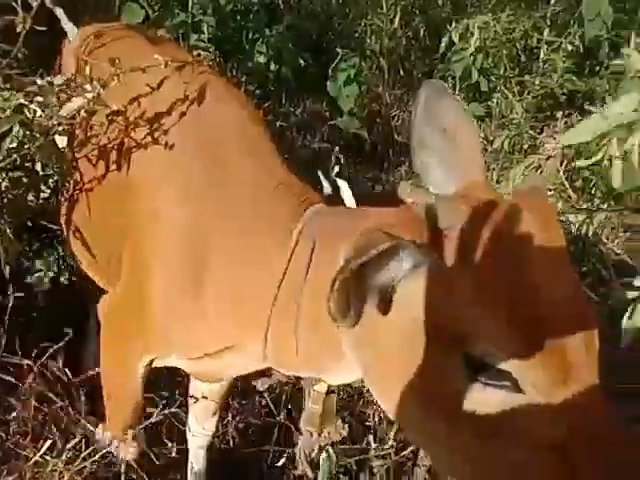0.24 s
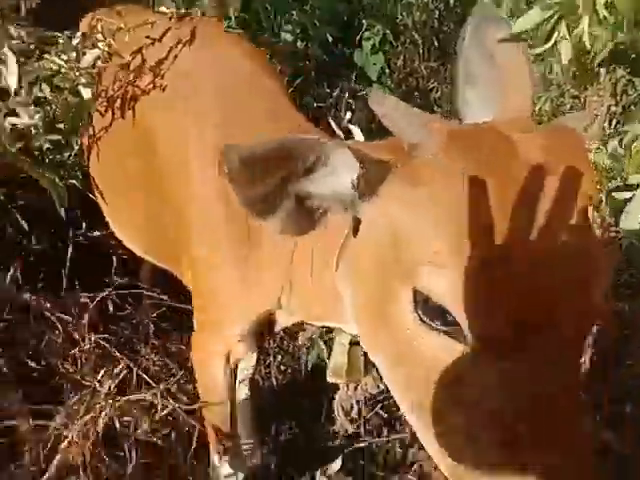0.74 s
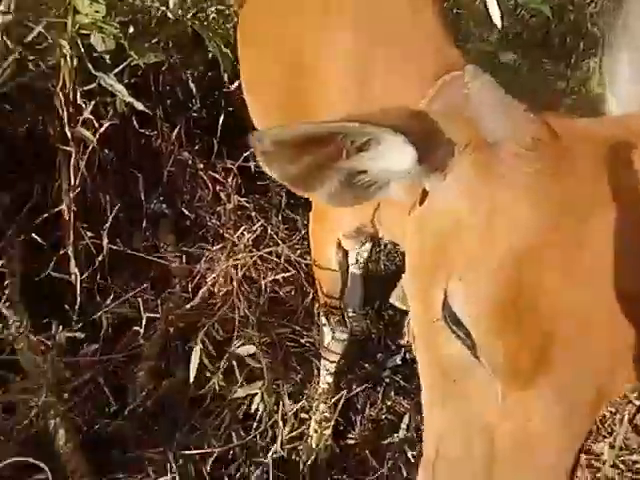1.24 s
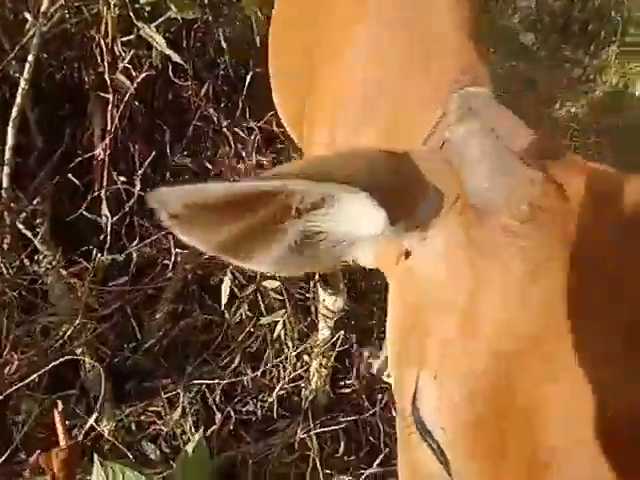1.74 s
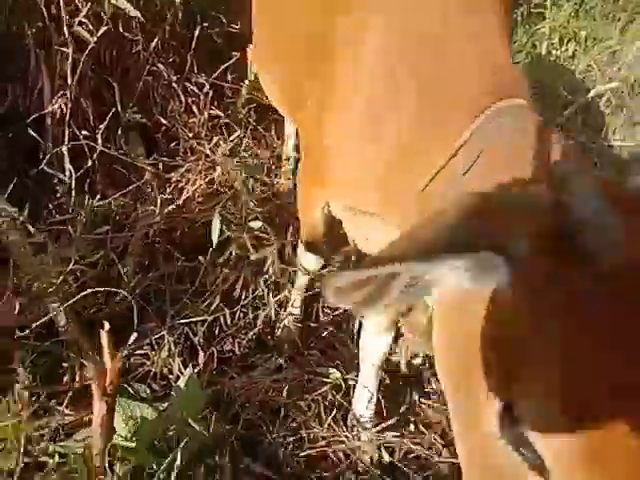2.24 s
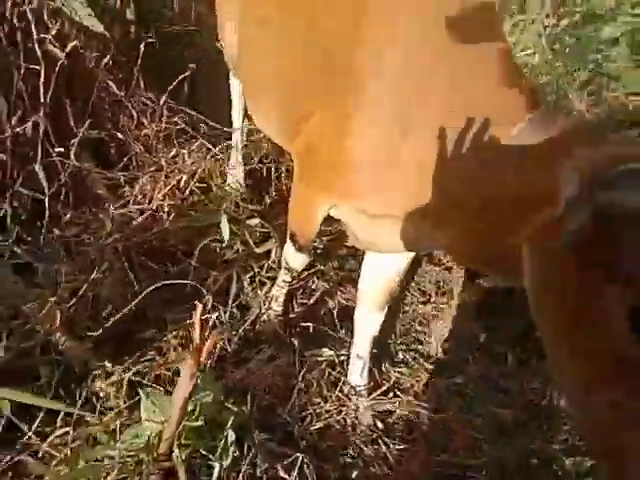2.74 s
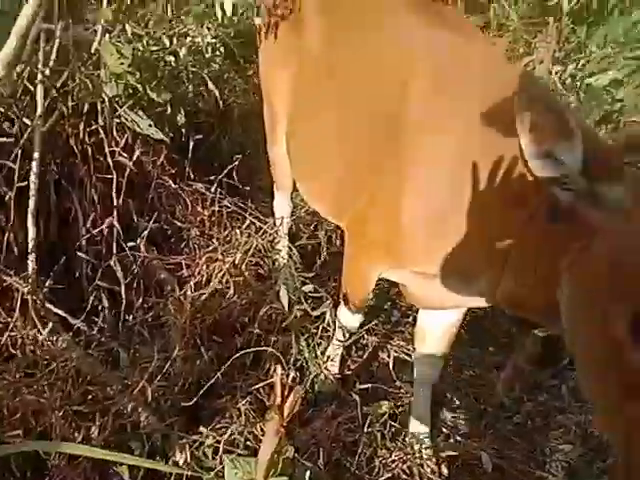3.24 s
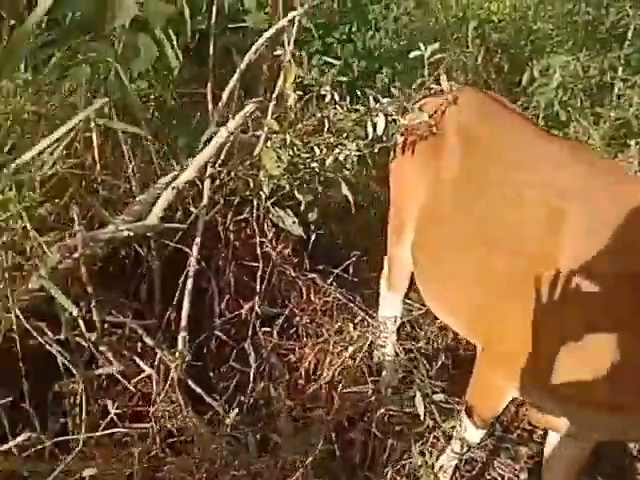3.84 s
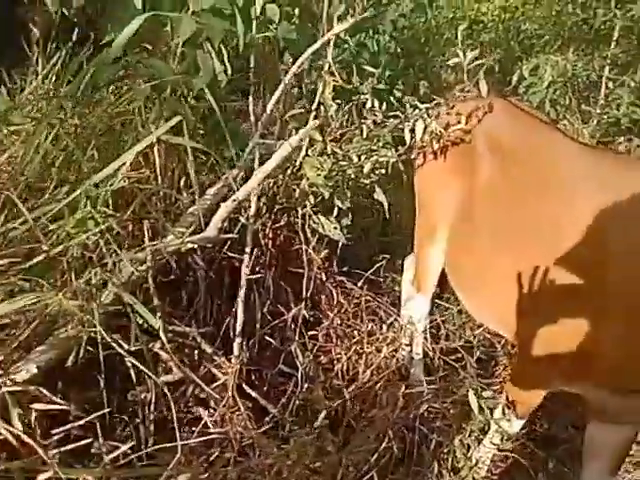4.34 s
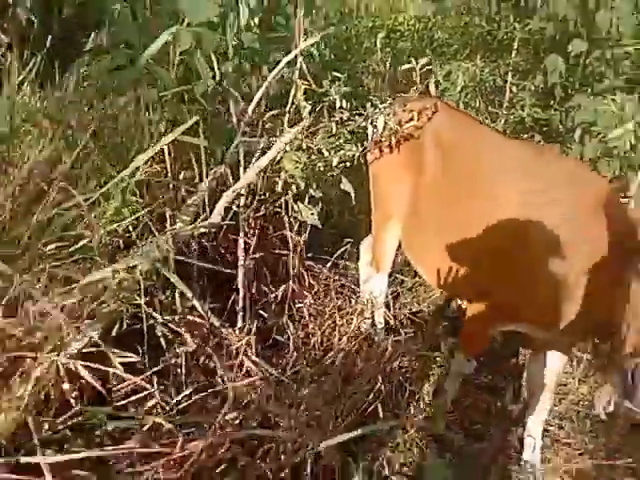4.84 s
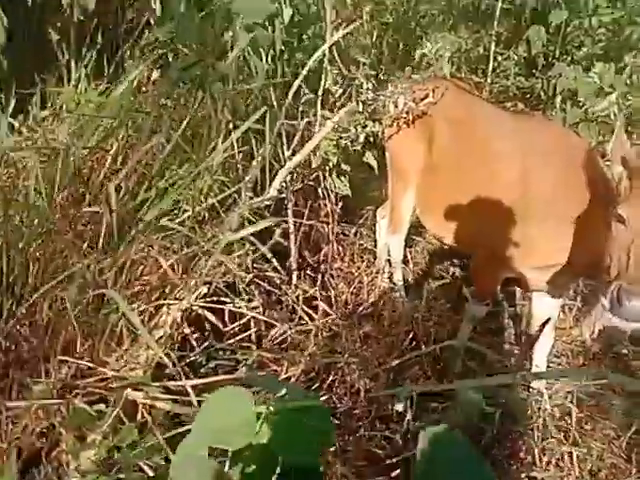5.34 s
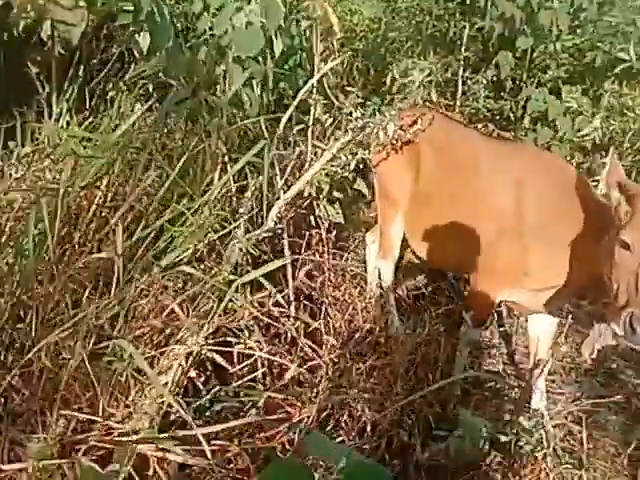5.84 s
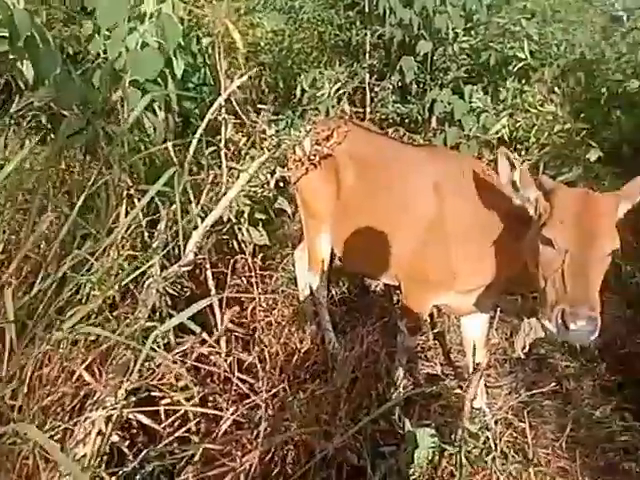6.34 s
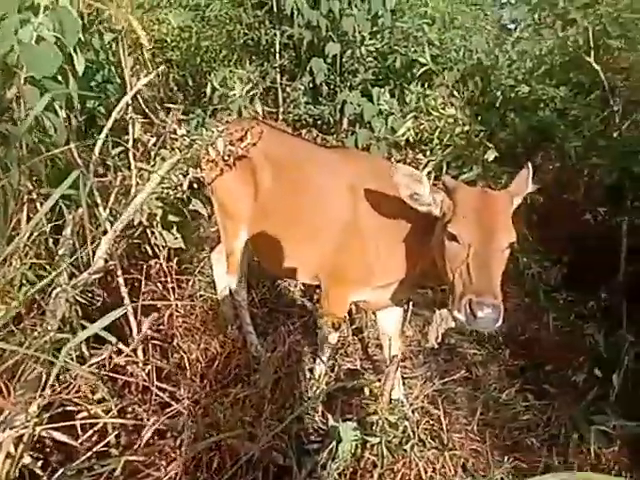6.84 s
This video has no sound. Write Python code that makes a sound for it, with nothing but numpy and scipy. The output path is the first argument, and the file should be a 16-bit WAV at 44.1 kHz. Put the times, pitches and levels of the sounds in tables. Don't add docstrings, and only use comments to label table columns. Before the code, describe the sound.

Crisp twig snaps, scraping stems and swishing leaves as a cow feeds, with one soft snort, against a steady high insect buzz and low engine hum.

```python
import sys
import numpy as np
from scipy import signal
from scipy.fft import rfft, irfft
from scipy.io import wavfile
from scipy.ndimage import uniform_filter1d

SR = 44100
rng = np.random.default_rng(int(sys.argv[2]) if len(sys.argv) > 2 else 0)


def put_to_file(sound):
    columns = np.atleast_2d(sound).T
    safe = np.clip(columns, -1, 1)
    whole_steps = np.round(safe * 32767)
    wavfile.write(sys.argv[1], SR, whole_steps.astype(np.int16))


N = 313242
T = np.arange(N) / SR

# peak in seconds, span in seconds, stems in dB, leaves in dB.
PULLS = [(0.1, 0.04, -54.5, -72), (0.2, 0.095, -53, -61.5), (0.39, 0.077, -60, -61.5),
         (0.56, 0.11, -48, -56.5), (0.62, 0.05, -47.5, -55), (0.765, 0.035, -44, -58.5),
         (1.22, 0.1, -60, -81), (1.46, 0.14, -58.5, -65), (1.68, 0.11, -46, -58.5),
         (1.775, 0.045, -44, -57), (1.91, 0.052, -52, -64), (1.95, 0.13, -49.5, -58.5),
         (2.38, 0.38, -57, -63.5), (2.82, 0.15, -58, -63), (2.925, 0.0061, -53, -55),
         (3.18, 0.11, -58, -62.5), (3.62, 0.1, -51.5, -59), (3.73, 0.085, -50.5, -60),
         (3.935, 0.016, -51, -64), (4.03, 0.086, -55, -64), (4.11, 0.037, -55, -63),
         (4.17, 0.084, -67, -67.5), (4.83, 0.13, -55.5, -66.5), (5.05, 0.085, -52.5, -60),
         (5.155, 0.089, -45, -62.5), (5.29, 0.24, -58, -66), (5.645, 0.074, -49, -59),
         (5.93, 0.078, -61.5, -70), (6.49, 0.045, -71, -69), (6.59, 0.082, -62.5, -77)]
STEMS_REST_DB, LEAVES_REST_DB, LEAVES_RECEDE_DB_PER_S = -66.5, -70.5, 4
# start in seconds, time to fall 60 dB in seconds, stems in dB, leaves in dB.
WHIPS = [(0.086, 0.23, -46.5, -63), (0.128, .3, -56, -68), (0.345, .3, -57, -63), (0.708, 0.29, -43, -52),
         (1.424, .2, -58, -64), (1.876, .2, -53, -67), (2.082, 0.31, -60, -57), (2.18, .2, -66, -58),
         (2.921, 0.092, -60, -54), (3.088, 0.25, -62, -71), (3.481, 0.23, -72, -72), (5.003, .2, -59, -63),
         (5.262, 0.13, -53, -59), (5.429, .2, -67, -68), (5.565, .3, -57, -68)]
# peak in seconds, span in seconds, brushing in dB, bell in dB.
MOVES = [(0.36, 0.55, -60.5, -57.5), (0.57, 0.17, -59, -54.5), (0.76, 0.056, -57, -49),
         (0.95, 0.11, -63, -65), (1.235, 0.039, -56, -46), (1.43, 0.35, -59, -56), (1.68, 0.081, -56, -53),
         (1.77, 0.06, -47, -51), (1.95, 0.21, -60, -54.5), (2.41, 0.3, -65, -62), (2.65, 0.33, -65, -56.5),
         (3.16, 0.3, -67, -65), (3.6, 0.13, -48.5, -51.5), (3.74, .07, -61, -49), (4.03, 0.25, -58, -60.5),
         (4.4, 0.68, -75, -75.5), (4.83, 0.25, -58.5, -61), (5.02, 0.047, -57, -54),
         (5.15, 0.033, -55, -50), (5.28, 0.12, -61, -62), (5.63, 0.11, -57, -51.5),
         (5.93, 0.11, -64, -58.5), (6.05, 0.37, -83, -68), (6.75, 0.027, -65, -65), (7.09, 0.04, -60, -60)]
BRUSH_REST_DB, BELL_REST_DB = -63, -69
# frequency in Hz, level in dB per Hz.
STEM_COLOUR = [(800, -22), (1500, -3.5), (2900, 0), (4500, -8.5), (5600, 1.5), (7000, -3.5), (9000, -55)]
LEAF_COLOUR = [(3000, -10.5), (5000, -0.5), (8300, -9), (10000, -3), (12000, -7.5), (13800, -12.5),
               (14500, -3.5), (16000, 3)]
BRUSH_COLOUR = [(300, -21), (480, -1), (800, 0), (1300, -3), (2200, -27)]
# start in seconds, level in dB, pitch in Hz, width in Hz, length in seconds.
SCRAPES = [(0.537, -49, 3340, 1780, .025), (0.584, -51, 2730, 1500, 0.04), (0.706, -49, 2320, 3000, .075),
           (0.758, -41.5, 3120, 1600, 0.028), (1.188, -51, 1900, 910, 0.0087),
           (1.2, -53.5, 1970, 1300, 0.051), (1.271, -59, 1460, 120, 0.049), (1.521, -60, 790, 143, 0.16),
           (1.591, -71, 2700, 300, 0.074), (1.61, -55, 3530, 300, 0.059), (1.647, -51, 2020, 900, 0.032),
           (1.777, -39.5, 3080, 1400, 0.017), (1.881, -46, 3880, 1800, 0.02), (1.933, -57, 855, 200, 0.044),
           (2.213, -67, 805, 150, 0.13), (3.7, -52.5, 910, 400, 0.042), (4.007, -52, 3340, 1200, 0.053),
           (5.145, -55, 2300, 1810, 0.045), (5.154, -43, 3000, 2500, 0.0053),
           (3.924, -49, 3000, 4000, .012), (5.292, -57, 1200, 506, 0.024), (5.636, -49, 1890, 2500, 0.038),
           (5.645, -41, 1500, 2200, .008), (1.187, -54, 2600, 2000, .006), (1.208, -59, 2500, 1400, .035)]
# start in seconds, peak in dB, pitch in Hz, time for the ring to fall 60 dB in seconds,
# bright crack in dB relative to the peak.
TWIGS = [(0.0596, -31, 4000, 0.006, -11), (0.54, -29.5, 3850, 0.012, -15), (0.5536, -28, 3630, 0.01, -15),
         (0.7113, -37, 3700, 0.0098, -14), (0.761, -26.5, 2950, 0.013, -19),
         (0.7782, -24, 2800, 0.0063, -17), (0.9632, -35, 3270, 0.0036, -12), (2.033, -46, 4000, 0.004, -4),
         (1.6268, -35, 2760, 0.013, -14), (1.6742, -33.5, 3240, 0.028, -11),
         (1.7752, -32, 3050, 0.012, -22), (1.8781, -36, 4860, 0.014, -10), (1.914, -37, 1760, 0.033, -14),
         (2.0947, -32, 2960, 0.0072, -12), (4.0284, -42, 2870, 0.011, -9), (4.1016, -34.5, 4940, 0.024, -4),
         (5.155, -24.5, 1970, 0.0053, -21), (5.6506, -26, 2150, 0.012, -19), (6.582, -37, 2650, 0.012, -27),
         (6.6084, -44, 2980, 0.015, -14), (7.0235, -44, 2800, 0.014, -2)]
KNOCKS = [
    (0.587, -36.5, 1260, 0.026, -20),
    (0.819, -40, 440, 0.04, -20),
    (1.189, -35, 1300, 0.02, -14),
    (1.214, -36, 1300, 0.028, -23),
    (1.254, -34.5, 1300, 0.025, -22),
    (1.418, -58, 1280, 0.018, -20),
    (1.738, -35, 1250, 0.016, -20),
    (1.777, -23.5, 1210, 0.045, -28),
    (1.784, -37, 1220, 0.016, -15),
    (3.924, -20.5, 754, 0.013, -8.5),
]
POPS = [
    (2.421, -41.5, 860, 0.042, -30),
    (5.65, -40.5, 830, 0.047, -26),
]
# start in seconds, peak in dB, pitch in Hz.
SPLINTERS = [(0.0862, -37, 3530), (0.3441, -45, 2010), (0.585, -34, 2970), (0.6898, -40, 3700),
             (0.7274, -36, 2900), (0.8114, -43, 2980), (0.863, -37, 2540), (0.8909, -33, 4710),
             (1.0321, -47, 4780), (1.4182, -43, 2110), (1.6437, -37, 2120), (1.8864, -35, 3930),
             (2.1221, -31, 2790), (2.7287, -48, 2590), (2.8733, -35, 4160), (2.9307, -41, 4770),
             (3.1657, -44, 1520), (3.631, -39, 3200), (3.922, -45, 2640), (4.083, -38, 2380),
             (4.8082, -38, 4800), (4.983, -41, 2590), (5.1238, -38, 1990), (5.2624, -37, 3900),
             (5.2894, -47, 3560), (5.427, -48, 3230), (5.5643, -47, 1700), (5.8915, -49, 2100),
             (7.068, -42, 1640)]
# start in seconds, peak in dB, pitch in Hz.
TICKS = [(0.091, -34, 10300), (0.1286, -56, 9510), (0.5033, -43, 11300), (0.5392, -41, 11300),
         (0.5831, -38, 11800), (0.62, -35, 9910), (0.7108, -41, 10500), (0.8624, -40, 10600),
         (0.891, -32.5, 11200), (1.7759, -52, 8880), (2.923, -33, 9900), (3.1847, -33, 9830),
         (3.482, -39, 10450), (3.6262, -45, 10500), (3.924, -44, 10700), (4.103, -30, 9570),
         (5.0045, -49, 9080), (5.0564, -36, 9710), (5.3398, -39, 10030), (5.4321, -47, 11790),
         (5.513, -38, 11300), (5.9174, -36, 11500), (6.325, -45, 10500), (6.6665, -59, 8590),
         (6.771, -47, 9210), (6.8109, -51, 10900), (7.023, -31, 10300)]
# start in seconds, peak in dB.
FLECKS = [(0.3461, -39), (0.9607, -60), (1.0326, -58), (1.3259, -53), (1.4242, -47), (1.5514, -49),
          (1.8756, -45), (1.9604, -37), (2.0812, -47), (2.2244, -43), (2.3072, -51), (2.5222, -48),
          (3.0879, -53), (3.3233, -50), (4.0008, -51), (4.1889, -51), (4.2527, -52), (4.5555, -63),
          (4.6543, -56), (4.9746, -48), (5.224, -46), (5.2644, -46), (5.3946, -58), (5.8207, -52),
          (5.879, -56), (6.0611, -65), (6.4313, -56), (6.7516, -52), (6.9117, -56)]
# time in seconds, effort in dB.
SNORT = [
    (5.12, -64),
    (5.145, -43),
    (5.19, -41),
    (5.23, -46.5),
    (5.3, -61),
]
# frequency in Hz, width in Hz, level in dB.
NOSTRILS = [(282, 120, 20), (400, 66, -6), (227, 100, 10)]
BELL_HZ, BELL_WIDTH = 1263, 80
# start in seconds, length in seconds, level in dB, pitch in Hz.
RINGS_FIRST = [(0.887, 0.043, -59, 1260), (0.997, 0.036, -59, 1262)]
RINGS_EARLY = [(2.289, 0.038, -54, 1286), (2.369, 0.069, -54, 1244), (2.488, 0.033, -72, 1270),
               (2.573, 0.033, -54, 1255), (2.604, 0.061, -66, 1237), (2.669, 0.051, -55, 1263),
               (2.75, 0.057, -56, 1300), (2.861, 0.035, -52, 1246), (2.898, 0.039, -58, 1280),
               (3.154, 0.044, -53.5, 1237), (3.262, 0.043, -55, 1257)]
RINGS_MIDDLE = [(4.129, 0.096, -56, 1240), (4.226, 0.028, -61, 1252), (4.32, 0.081, -57, 1259),
                (4.452, 0.03, -55, 1276), (4.512, 0.029, -57, 1269), (4.556, 0.031, -59, 1249),
                (4.645, 0.042, -55, 1259), (4.773, 0.035, -57, 1254), (4.827, 0.046, -65, 1255),
                (4.871, 0.046, -65, 1254)]
RINGS_FIFTH = [(5.206, 0.083, -58, 1265), (5.291, 0.041, -58, 1283), (5.493, 0.045, -56, 1285),
               (5.564, 0.047, -57, 1279)]
RINGS_LATE = [(5.715, 0.025, -57, 1267), (5.753, 0.032, -65, 1247), (5.964, 0.08, -56.5, 1260),
              (6.085, 0.046, -60, 1271), (6.219, 0.029, -59, 1276), (6.653, 0.034, -60.5, 1235),
              (6.726, 0.05, -54, 1252), (7.062, 0.042, -65, 1236)]
RING_EDGE_S = 0.012
# frequency in Hz, level in dB per Hz.
CHORUS = [(4500, -42), (5250, -6), (5650, -5.5), (6200, -2), (6570, -3), (7200, 0), (7700, -9.5),
          (8300, -37)]
# time in seconds, pulses per second.
PULSES = [(0, 103), (1.25, 103), (1.35, 93.1), (7.1, 93.1)]
# frequency in Hz, width in Hz, level in dB.
SINGERS = [
    (5622, 154, -6),
    (5827, 220, -7.5),
    (6587, 210, 0.5),
    (7050, 460, -6),
    (7360, 160, -16),
]
# time in seconds, level in dB.
HUM = [(0.0, -36), (0.43, -33), (0.67, -36), (0.95, -33.5), (1.2, -34), (1.8, -33), (2.03, -35),
       (2.27, -31.5), (2.6, -35.5), (2.72, -32), (3.47, -34), (3.6, -31.5), (3.93, -33.5), (4.72, -32),
       (5.04, -34), (5.79, -31), (6.11, -33), (7.1, -32)]
HUM_HZ = 74.96
# multiple of a third of the hum's pitch, level in dB.
SHAFT = [(2, -71), (4, -72), (5, -62), (6, -62), (7, -71.5)]
# time in seconds, pitch in Hz, level in dB.
VEHICLE = [
    [(2.45, 176, -68), (2.7, 176, -62), (3.2, 176, -58.5), (3.8, 177, -64), (4.0, 170.3, -88),
     (4.2, 174.3, -55), (4.45, 174, -69)],
    [(4.45, 172, -84), (4.6, 175.2, -53.5), (5.0, 175, -58.5), (5.3, 164.5, -56.5), (5.5, 161.6, -46.5),
     (5.7, 158.6, -50), (5.85, 154, -72)],
    [(5.6, 146.2, -62), (5.8, 147, -50), (6.05, 134.6, -49), (6.25, 130, -73)],
    [(5.55, 125, -81), (5.75, 119.8, -43.5), (6.0, 111.3, -51), (6.2, 107, -62)],
    [(3.55, 219, -71), (3.9, 219, -66), (4.1, 218, -70)],
]
# peak in seconds, span in seconds, rumble in dB, murmur in dB.
SURGES = [
    (0.457, 0.072, -62, -56.5),
    (0.28, 0.076, -62, -59),
    (1.78, 0.071, -45, -64),
    (3.56, 0.076, -38, -49),
    (3.57, 2.4, -64, -64),
    (6.75, 0.18, -62, -67),
    (4.58, 1.4, -59.5, -62.5),
    (6.13, 0.98, -45.5, -81),
    (7.1, 0.065, -36.5, -72),
]
# frequency in Hz, level in dB per Hz.
RUMBLE_COLOUR = [(12, -6), (25, 3), (42, -24), (62, 8), (95, 10), (170, -2.5), (260, -16.5), (500, -48)]
MURMUR_COLOUR = [(190, 3), (250, 0.5), (330, 10.5), (420, 6.5), (560, -35)]
AIR_COLOUR = [(200, -10), (500, 5), (1000, -12), (4500, -10.5), (8300, -14.5), (13800, -21.5), (14500, -9),
              (16000, -13)]
# start in seconds, length in seconds, start in Hz, end in Hz, level in dB.
BIRD = [
    (5.777, 0.093, 3260, 3410, -69),
    (5.903, .04, 3480, 3670, -64),
    (6.185, 0.051, 3120, 3040, -64.5),
    (6.878, 0.14, 3400, 3260, -69),
]


def gain_of(db):
    return 10 ** (np.asarray(db) / 20)


def white():
    return rng.standard_normal(N)


def evened(x):
    return x / np.sqrt(np.mean(x ** 2) + 1e-20)


def curves(rows, t=T):
    s, *columns = np.transpose(rows)
    return [np.interp(t, s, column) for column in columns]


def colour(x, points):
    f, db = np.transpose(points)
    hz = np.fft.rfftfreq(len(x), 1 / SR)
    shape_db = np.interp(np.log(hz + 1), np.log(f), db, -120, -120)
    return evened(irfft(rfft(x) * gain_of(shape_db), len(x)))


def drift(hz):
    f = np.fft.rfftfreq(N, 1 / SR)
    return evened(irfft(rfft(white()) / (1 + (f / hz) ** 2), N))


def resonate(x, hz, width):
    r = np.exp(-np.pi * width / SR)
    return 2 * signal.lfilter([1 - r], [1, -r * np.exp(2j * np.pi * hz / SR)], x).real


def resonate_twice(x, hz, width, second_width):
    return resonate(resonate(x, hz, width), hz, second_width)


def add(mix, s, sound):
    part = mix[round(s * SR):][:len(sound)]
    part += sound[:len(part)]


def tone(hz):
    return np.sqrt(2) * np.sin(2 * np.pi * np.cumsum(hz) / SR)


def patchy(x, db, bins, frames):
    z = signal.stft(x, nperseg=512, noverlap=384)[2]
    field = uniform_filter1d(rng.standard_normal(z.shape), bins, 0)
    field = uniform_filter1d(field, frames, 1)
    return evened(signal.istft(z * gain_of(db * evened(field)), nperseg=512, noverlap=384)[1][:N])


def swells(rows, *rest_db):
    s, span, *peaks_db = np.transpose(rows)[:, :, None]
    t = T[::64]
    late = (t - s) / np.clip(span, 0.005, 9)
    late = np.where(late < 0, -late / 1.44, late)
    fall_db = 14 * late ** 1.69
    levels = []
    for db, rest in zip(peaks_db, rest_db):
        power = gain_of(2 * rest) + gain_of(2 * (db - fall_db)).sum(0)
        levels.append(np.interp(T, t, 10 * np.log10(power)))
    return levels


def whipped(db, column):
    power, t = np.zeros(N), np.arange(12000) / SR
    for row in WHIPS:
        add(power, row[0], gain_of(2 * (row[column] - 60 * t / np.clip(row[1], 0.03, 0.6))))
    return 10 * np.log10(gain_of(2 * db) + power)


def crackle(per_s, spread_db, hiss, lo_hz, hi_hz, sharp, dry):
    size = gain_of(spread_db * np.minimum(rng.exponential(1, N), 3.2))
    size = size * (rng.random(N) < per_s / SR)
    fibre = rng.integers(0, 9, N)
    rings = np.zeros(N)
    for k, hz in enumerate(np.geomspace(lo_hz, hi_hz, 9)):
        rings += evened(resonate(size * (fibre == k), hz, hz / sharp)) * np.sqrt(hz / hi_hz)
    return evened(rings) + dry * evened(size * white()) + hiss * white()


def scrub():
    stems_db, leaves_db = swells(PULLS, STEMS_REST_DB, LEAVES_REST_DB - LEAVES_RECEDE_DB_PER_S * T[::64])
    stems_db, leaves_db = whipped(stems_db, column=2), whipped(leaves_db, column=3)
    brush_db = swells(MOVES, BRUSH_REST_DB)[0]
    flicker = drift(27)
    fibres = crackle(800, 2.2, hiss=3.2, lo_hz=1490, hi_hz=5700, sharp=6, dry=1.0)
    fibres = fibres + 0.44 * crackle(90, 4.4, hiss=0, lo_hz=1670, hi_hz=4650, sharp=25, dry=0.1)

    stems = patchy(colour(fibres, STEM_COLOUR), 3.3, bins=2, frames=17)
    stems = stems * gain_of(stems_db + 1.2 * flicker)

    leaves = crackle(2300, 6.8, hiss=4.5, lo_hz=6300, hi_hz=16000, sharp=1.9, dry=0.31)
    leaves = patchy(colour(leaves + 0.5 * fibres, LEAF_COLOUR), 1.9, bins=5, frames=9)
    leaves = leaves * gain_of(leaves_db + 7.5 + 1.15 * flicker)

    brush = patchy(colour(white() + 0.39 * fibres, BRUSH_COLOUR), 4, bins=2, frames=19)
    brush = brush * gain_of(brush_db - 3.5 + 2.6 * flicker)
    return stems + leaves + brush


def scrapes():
    out = np.zeros(N)
    draws = rng.standard_normal((len(SCRAPES), 2, 8000))
    for (s, db, hz, width, length), (noise, slips) in zip(SCRAPES, draws):
        grain = noise * gain_of(1.3 * evened(uniform_filter1d(slips, size=60)))
        t = np.arange(min(round(length * SR), 8000)) / SR
        shape = np.minimum(t / 0.0013, 1) * np.minimum((length - t) / (0.36 * length), 1)
        stem = evened(resonate_twice(grain, hz, width, 0.65 * width))[-len(t):]
        add(out, s, gain_of(db) * stem * shape)
    return out


def twigs():
    out, t = np.zeros(N), np.arange(2600) / SR
    rows = [*KNOCKS, *TWIGS, *POPS]
    rows += [(s, db - 2, hz, 0.0035, -3) for s, db, hz in SPLINTERS]
    noises = rng.standard_normal((len(rows), 2600))
    for (s, db, hz, t60, crack_db), noise in zip(rows, noises):
        fall = gain_of(-60 * t / np.clip(t60, 0.003, 0.08))
        ring = np.sin(2 * np.pi * hz * t) + 0.067 * evened(resonate(noise, hz, 0.69 * hz))
        crack = gain_of(crack_db - 60 * t / 0.0018) * noise
        add(out, s, gain_of(db) * (ring * fall * np.minimum(t / 0.00046, 1) + crack))
    return out


def ticks():
    out, t = np.zeros(N), np.arange(900) / SR
    rows = [*TICKS, *((s, db + 4.5, 11000) for s, db in FLECKS)]
    for (s, db, hz), noise in zip(rows, rng.standard_normal((len(rows), 900))):
        burst = evened(resonate_twice(noise, hz, 3500, 5000)) + 0.35 * evened(resonate(noise, 15000, 1500))
        add(out, s, gain_of(db - 15.5 - 60 * t / 0.031) * burst)
    return out


def snort():
    turns = np.cumsum(95 * (1 + 0.46 * drift(40))) / SR
    flaps = np.diff(np.floor(turns), prepend=0) * gain_of(3.2 * white())
    drive = evened(flaps) + 1.3 * white()
    nose = sum(gain_of(db) * resonate_twice(drive, hz, width, width) for hz, width, db in NOSTRILS)
    inside = (T > SNORT[0][0]) & (T < SNORT[-1][0])
    return gain_of(curves(SNORT)[0]) * nose / np.std(nose[inside]) * inside


def bell():
    noise = white()
    cavity = evened(resonate_twice(noise, BELL_HZ, BELL_WIDTH, 1.1 * BELL_WIDTH))
    skirt = 0.5 * evened(resonate_twice(noise, BELL_HZ, 330, 420))
    bell_db = swells(MOVES, BRUSH_REST_DB, BELL_REST_DB)[1]
    return gain_of(bell_db - 3.5 + 1.0 * drift(14)) * (cavity + skirt)


def rings():
    out, waver = np.zeros(N), drift(31)
    for s, length, db, hz in [*RINGS_FIRST, *RINGS_FIFTH, *RINGS_EARLY, *RINGS_MIDDLE, *RINGS_LATE]:
        t = np.arange(0, length + RING_EDGE_S, 1 / SR)
        edge = np.clip(np.minimum(t, t[-1] - t) / RING_EDGE_S, 0, 1)
        wobble = waver[round(s * SR):][:len(t)]
        level = gain_of(db - 3 + 1.4 * wobble) * edge[:len(wobble)]
        add(out, s - RING_EDGE_S / 2, level * tone(hz + 30 * wobble))
    return out


def cicadas():
    turns = np.cumsum(curves(PULSES)[0] + 0.5 * drift(2)) / SR
    gate = np.exp(-(turns % 1) / 0.51) + 0.5 * np.exp(-(3 * turns % 1) / 0.23)
    near = colour(gate * white(), CHORUS) * gain_of(-3 + 2 * drift(1.5))
    far = patchy(colour(white(), CHORUS), 1.0, bins=3, frames=41)
    for hz, width, db in SINGERS:
        buzz = resonate_twice((0.63 + gate) * white(), hz, width, width)
        far = far + gain_of(db + 0.59 * drift(1.0)) * evened(buzz)
    throb = np.sin(2 * np.pi * 20.6 * T) * (T < 1.4)
    sway_db = 0.24 * np.cos(np.pi * (T - 0.8) / 4.5) + 0.5 * drift(2.8)
    return gain_of(-46.5 + sway_db) * evened((near + far) * (1 + 0.21 * throb))


def machines():
    hz = HUM_HZ + 0.56 * drift(3.18)
    out = gain_of(curves(HUM)[0]) * tone(hz)
    for k, order_db in SHAFT:
        order_hz = k * hz / 3 + 1.45 * drift(7.5)
        out = out + gain_of(order_db + 0.63 * drift(4.2)) * tone(order_hz)
    for strand in VEHICLE:
        hz, db = curves(strand)
        out = out + gain_of(db) * tone(hz) * (T > strand[0][0]) * (T < strand[-1][0])
    rumble_db, murmur_db = swells(SURGES, -48, -72)
    out = out + gain_of(murmur_db + 2.2 * drift(6.8)) * colour(white(), MURMUR_COLOUR)
    return out + gain_of(rumble_db - 2.5 + 2.8 * drift(3.3)) * colour(white(), RUMBLE_COLOUR)


def bird():
    out = np.zeros(N)
    for s, length, from_hz, to_hz, db in BIRD:
        hz = np.linspace(from_hz, to_hz, round(length * SR))
        add(out, s, gain_of(db) * tone(hz) * np.hanning(len(hz)))
    return out


def still_air():
    return gain_of(-64.5 + 1.8 * drift(14)) * colour(white(), AIR_COLOUR)


def scene():
    cow = scrub() + scrapes() + twigs() + ticks() + snort() + bell() + rings()
    background = cicadas() + machines() + bird() + still_air()
    mono = cow + background
    return np.array([mono, mono])


def band_limit(x):
    return signal.sosfilt(signal.butter(12, 16860, fs=SR, output="sos"), x)


def record(dry):
    low_pass = signal.firwin(511, 15560, window=("kaiser", 8), fs=SR)
    cut = signal.oaconvolve(dry, low_pass[None], "same")
    trace = cut[0] - 0.7 * resonate(cut[0], 75, 25)
    trace = trace - 0.6 * resonate(cut[0], 6400, 2500)
    trace = trace + 2 * resonate(cut[0], 13000, 6000)
    stray = gain_of(-40 + 7 * drift(8.2)) * np.roll(trace, 90) * drift(16)
    return band_limit(cut + np.array([stray, -stray]))


dry = scene()
out = record(dry)
put_to_file(out)
```